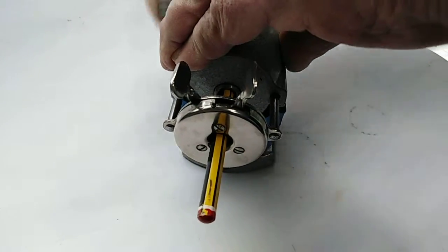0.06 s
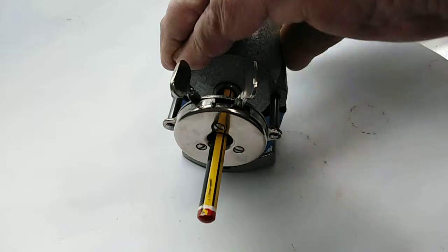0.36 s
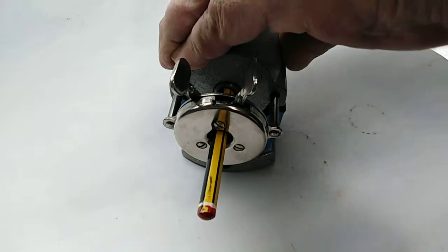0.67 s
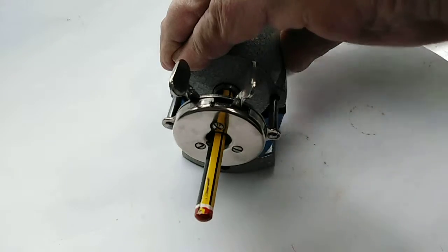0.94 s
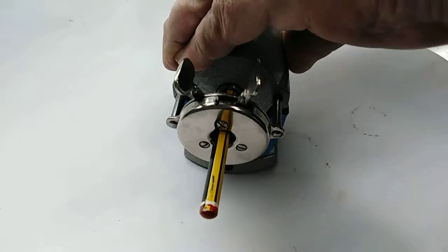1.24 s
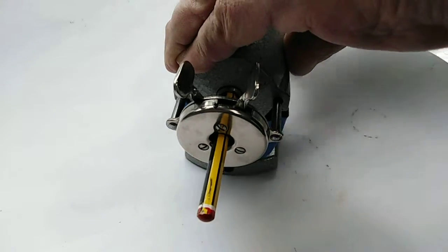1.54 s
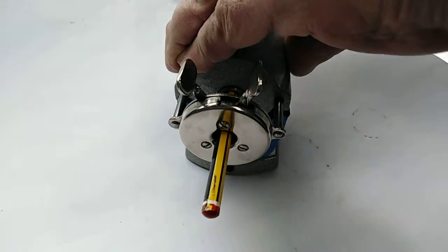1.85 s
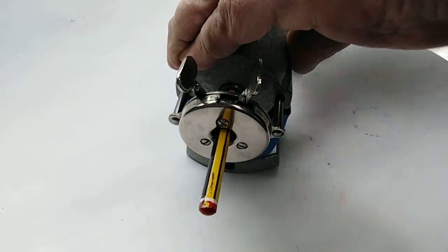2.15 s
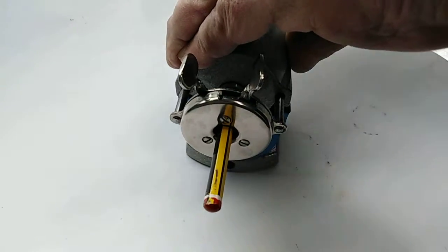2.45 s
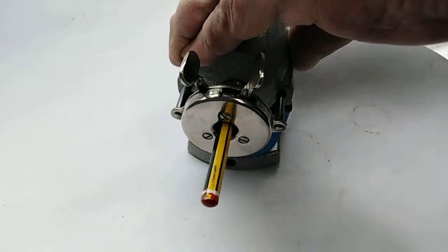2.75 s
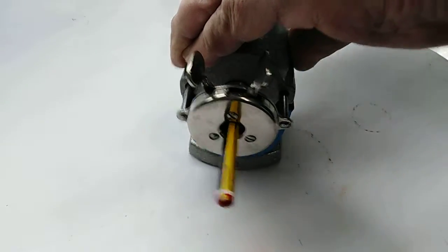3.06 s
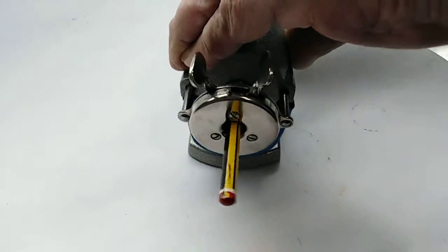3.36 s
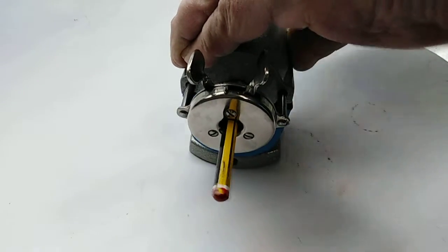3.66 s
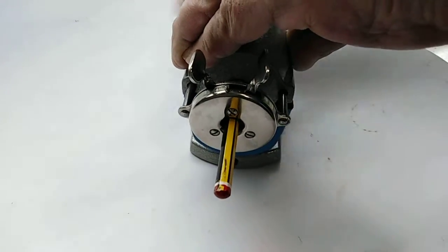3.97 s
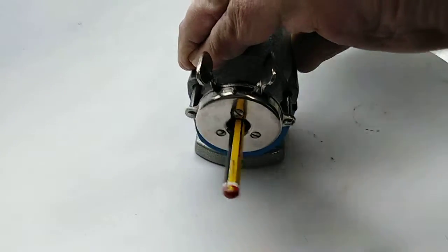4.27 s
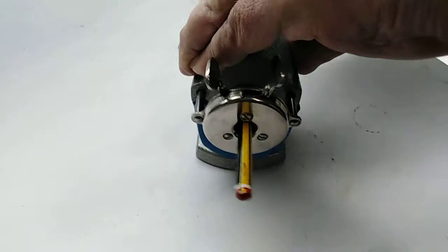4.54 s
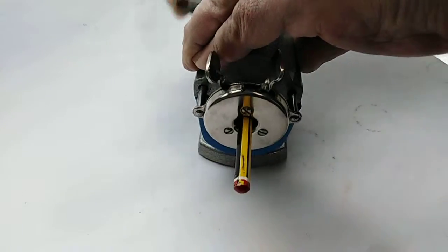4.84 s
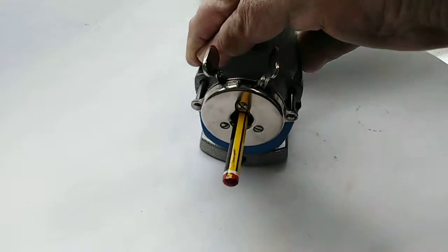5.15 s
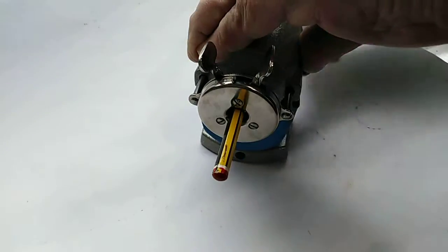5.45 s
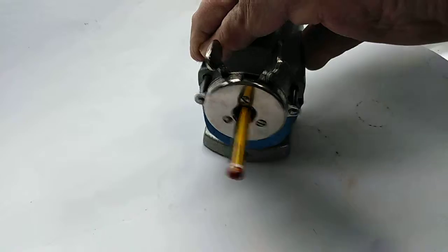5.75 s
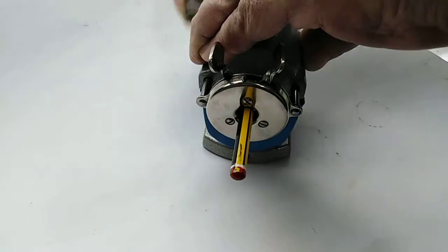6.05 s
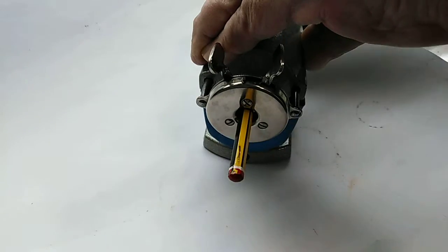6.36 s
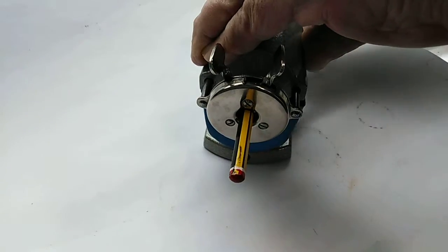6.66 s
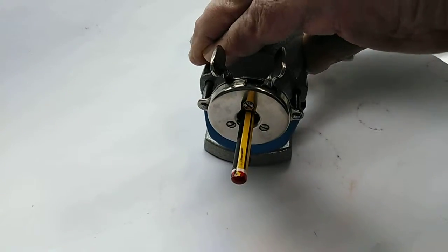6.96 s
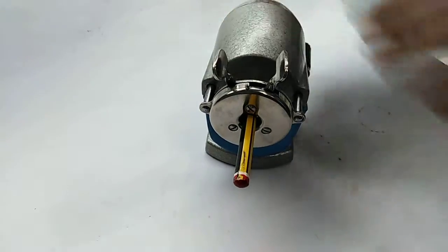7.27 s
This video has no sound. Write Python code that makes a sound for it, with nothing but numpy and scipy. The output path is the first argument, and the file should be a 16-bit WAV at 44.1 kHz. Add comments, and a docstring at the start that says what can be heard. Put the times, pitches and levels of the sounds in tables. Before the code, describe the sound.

Close up in a small, quiet room, a pencil rasps and crackles in the cutter of a metal desk sharpener. The gears rattle in the casing with each turn of the crank and shake the desk. A short, sharp squeak interrupts the rhythm past the middle, followed by lighter, uneven grinding and rubbing, and some faint clicks as the hand lets go.

```python
"""A hand-cranked metal pencil sharpener is turned on a desk in a small, quiet room, heard close in stereo.
From the start the cutter rasps through wood in dense tiny fractures, gear teeth chatter in the casing
and shake the desk, and the pencil rubs in its guide. After seven turns, at 4.3 s, the crank stalls with
a stick-slip squeak. It turns on more lightly, and near 7 s the hand lets go with a few knocks."""
import sys
import numpy as np
from scipy import signal
from scipy.fft import rfft, irfft
from scipy.io import wavfile
from scipy.ndimage import uniform_filter1d

SR = 44100
rng = np.random.default_rng(int(sys.argv[2]) if len(sys.argv) > 2 else 0)


def generate_wav(signal):
    """Clip the signal to [-1, 1] and save it as 16-bit WAV at the path in sys.argv[1]."""
    frames = np.transpose(np.atleast_2d(signal))
    scaled = np.clip(frames, -1, 1) * 32767
    pcm = np.round(scaled).astype(np.int16)
    wavfile.write(sys.argv[1], SR, pcm)


N = 326781
TIME = np.arange(N) / SR
LEFT_RIGHT = np.array([[1], [-1]])


def undb(db):
    """Decibels to amplitude ratio."""
    return 10 ** (np.asarray(db) / 20)


def unit(x):
    """Normalisation to rms 1."""
    return x / np.sqrt(np.mean(x ** 2))


def unit_energy(response):
    """Normalisation of a stereo response to energy 1 on the left."""
    return response / np.linalg.norm(response[0])


def sides(pan_db):
    """Level difference as two gains; pan is left minus right."""
    return undb(LEFT_RIGHT * pan_db / 2)


def spectrum(points, size=N):
    """Interpolation of (frequency [Hz], level [dB]) points over log frequency."""
    hz, db = np.transpose(points)
    return np.interp(np.log(np.fft.rfftfreq(size, 1 / SR) + 1), np.log(hz), db)


def band(x, kind, edge_hz, order=4):
    """Butterworth low-pass or high-pass."""
    return signal.sosfilt(signal.butter(order, edge_hz, kind, fs=SR, output="sos"), x)


def convolve(x, response):
    """Linear filtering by a left and a right impulse response."""
    return signal.oaconvolve(np.broadcast_to(x, (2, N)), response, axes=1)[:, :N]


def modes(table, size=8192):
    """Modal superposition: an impulse response is a sum of damped sinusoids."""
    t = TIME[:size]
    return sum(width * undb(db) * sides(pan) * np.exp(-np.pi * width * t)
               * np.sin(2 * np.pi * hz * t - LEFT_RIGHT * lag / 2)
               for hz, width, db, pan, lag in table)


def walk(per_s):
    """Slow random modulation with a spread near 1."""
    return 1.2 * np.interp(TIME * per_s, np.arange(8192), rng.standard_normal(8192))


def grains(per_s, spread_db):
    """Shot noise: random impulses of uneven size, with their own strength on each side."""
    occurs = rng.random(N) < per_s / SR
    sizes = undb(spread_db * np.minimum(rng.exponential(size=N), 5))
    return unit(occurs * sizes * rng.standard_normal((2, N)))


def bursts(times, gains, decays, size=4096):
    """Impact envelopes: instant onset, exponential decay."""
    out = np.zeros(N + size)
    for s, gain, decay in zip(times, gains, decays):
        start = int(np.clip(s * SR, 0, N))
        out[start:start + size] += gain * np.exp(-TIME[:size] / max(decay, 1 / SR))
    return out[:N]


def bumps(times, heights, width_s):
    """A Gaussian swell around each time."""
    return sum(height * np.exp(-np.minimum(((TIME - s) / width_s) ** 2, 20))
               for s, height in zip(times, heights))


def swing(turn, depth_db, peak_turns):
    """Amplitude modulation, one cycle to a turn of the crank."""
    return undb(depth_db * np.cos(2 * np.pi * (turn - peak_turns)))


# spectrum of the room tone: (frequency [Hz], relative level [dB])
ROOM_TONE = [(20, -29), (50, -14), (95, 1.5), (190, -14), (300, -33), (450, -39), (2000, -35), (14000, -44)]
# faint high tones: (frequency [Hz], level [dB])
WHINE = [(9550, -94), (12651, -88)]
def background():
    """Noise floor: a low rumble, partly coherent between the sides, and a phase-modulated whine."""
    noise = rng.standard_normal(N) + 0.48 * rng.standard_normal((2, N))
    rumble = unit(irfft(rfft(noise) * undb(spectrum(ROOM_TONE)), N))
    whine = sum(undb(db) * np.sin(2 * np.pi * hz * TIME + 1.5 * walk(300)) for hz, db in WHINE)
    return undb(-79) * rumble + whine


def room(x, t60_s, wet_db, size=16384):
    """Reverberation: the diffuse field of a small furnished room decays exponentially."""
    t = TIME[:size]
    onset = np.clip(t / 0.0014 - 1, 0, 1)
    tail = rng.standard_normal((2, size)) * undb(-60 * t / t60_s) * onset
    return undb(wet_db) * convolve(x, unit_energy(tail))


# position of the crank: (time [s], angle [turns])
TURNS = [(-.1, 0), (.5, 1), (1.1, 2), (1.71, 3), (2.33, 4), (2.95, 5), (3.68, 6), (4.3, 7), (4.56, 7.08),
         (4.95, 7.5), (5.22, 7.75), (5.62, 8), (6.15, 8.5), (6.3, 8.68), (6.85, 8.84)]
def crank():
    """Rotation at piecewise constant speed, in turns so far."""
    return np.interp(TIME, *np.transpose(TURNS))


# pushes of the hand on the crank, in relative levels:
# (time [s], length [s], rasp [dB], swell from start to end [dB], hiss over rasp [dB], gear load [dB])
PUSHES = [(-0.121, 0.39, -38, 0.5, 1.5, -45), (0.243, 0.38, -36.5, 1.5, 1, -44),
          (0.571, 0.2, -37, -2.5, 0, -46.5), (0.712, 0.19, -33.5, 14.5, 0.5, -45.5),
          (0.863, 0.43, -36.5, -5, 1, -45), (1.22, 0.3, -37, 1, 1, -47), (1.399, 0.3, -35, 2, 2.5, -43),
          (1.653, 0.24, -35.5, -11, -3, -44), (1.8, 0.17, -41, -8, 5, -49),
          (1.86, 0.27, -37.5, 14.5, 1.5, -46), (2.058, 0.32, -35, 8, 1, -44.5),
          (2.33, 0.34, -40, -1, 0.5, -44.5), (2.567, 0.19, -38, 16.5, 2.5, -47.5),
          (2.743, 0.42, -36.5, -1, 1, -44), (3.138, 0.37, -40, -9, 0, -48),
          (3.351, 0.1, -33.5, 3, 3.5, -42), (3.467, 0.25, -35.5, 5.5, 4.5, -44.5),
          (3.665, 0.31, -39, 4, -1, -45), (3.917, 0.18, -36.5, 15.5, 2, -44),
          (4.05, 0.3, -36.5, 12, 2.5, -43), (4.285, 0.21, -53.5, -9, -6.5, -44),
          (4.553, 0.39, -43, 0.5, 1, -46), (4.904, 0.19, -44.5, 0, -0.5, -45.5),
          (5.074, 0.24, -47, 18.5, 4, -44.5), (5.31, 0.089, -45.5, 8, -1, -43),
          (5.394, 0.19, -43.5, 0, 0.5, -41.5), (5.529, 0.25, -39.5, 10, -1, -43.5),
          (5.68, 0.21, -41, -12, -2, -42.5), (5.856, 0.16, -44, 7.5, 0.5, -49),
          (5.944, 0.34, -41, 18.5, 0.5, -46.5), (6.243, 0.077, -47, -12, 1, -45.5),
          (6.318, 0.1, -51, -20, 0.5, -47.5), (6.455, 0.11, -55.5, -11, 2, -54),
          (6.555, 0.1, -52, 4, 2, -45.5), (6.651, 0.056, -50.5, 15, 4, -40.5),
          (6.701, 0.13, -57, 9, 8.5, -44.5)]
def pushes(attack_s=0.046, release_s=0.045, arch_db=4, gear_exponent=0.48):
    """Incoherent addition: overlapping pushes sum in power to envelopes of rasp, hiss and gear load."""
    power = np.zeros((3, N))
    for s, length, rasp_db, swell_db, hiss_db, gear_db in PUSHES:
        on = (TIME > s) & (TIME < s + length)
        t = TIME[on] - s
        place = 2 * t / length - 1
        grip = np.minimum(np.minimum(t / attack_s, (length - t) / release_s), 1)
        force = grip * undb(swell_db * place / 2 - arch_db * place ** 2)
        bite = undb(rasp_db) * force
        load = undb(gear_db) * force ** gear_exponent
        power[:, on] += np.array([bite, undb(hiss_db) * bite, load]) ** 2
    return np.sqrt(power)


# desk top: (frequency [Hz], bandwidth [Hz], level [dB], pan [dB], left lag [rad])
DESK_MODES = [(89.4, 5.1, 2.5, -1, 0.083), (100.3, 12, 3, -1.4, 0.0069), (162, 70, -9.5, 0, 0.12),
              (248.7, 11, -10.5, 0.72, 0.13), (309, 150, -11.5, 0, 0.23)]
# the base rocks on the desk: (time [s], level [dB])
ROCKS = [(0.38, -44.5), (1.02, -43.5), (1.33, -50), (1.89, -53), (2.27, -47), (2.88, -45), (3.58, -44.5),
         (3.9, -68), (4.44, -49), (4.65, -55), (5.42, -42), (5.81, -68), (6.2, -63), (6.79, -54)]
def desk(mesh, load):
    """Structure-borne sound: gear jolts pass through the base into the low modes of the desk."""
    thud = convolve(rng.standard_normal(N) * (mesh + 1.8), modes(DESK_MODES))
    thud = band(band(thud, "high", 73, order=6), "low", 335, order=10)
    s, db = np.transpose(ROCKS)
    rocking = bumps(s, undb(db), width_s=0.042)
    return unit(thud) * np.hypot(undb(-7) * load, rocking)


# cast body: (frequency [Hz], bandwidth [Hz], level [dB], pan [dB], left lag [rad])
CASING_MODES = [(690, 90, -18, -6, 4.7), (670, 42, 1, -5, 0.67), (808, 63, 9.5, -1.5, 0.51),
                (951, 30, 2, -2, 0.66), (1074, 100, -1.5, -2, 0.73), (1316, 22, 5.5, -8.5, 2.3),
                (1637, 120, 1.5, -7.5, 2.33), (2250, 230, -12.5, -17, 2.6)]
def casing():
    """Radiation efficiency: the response of a body too small to radiate lows."""
    return unit_energy(band(modes(CASING_MODES), "high", 486, order=6))


def clonks(times, gains, pitches, rise_s=.004, lag_rad=1, size=1024):
    """Damped vibration of the hand-held casing; the pitch depends on where the parts touch."""
    out, t = np.zeros((2, N + size)), TIME[:size]
    shape = (t / rise_s * np.exp(1 - t / rise_s)) ** 2 * sides(-3.5)
    for s, gain, hz in zip(times, gains, pitches):
        start = int(s * SR)
        tone = np.sin(2 * np.pi * hz * t - LEFT_RIGHT * lag_rad / 2)
        out[:, start:start + size] += gain * shape * tone
    return out[:, :N]


def tooth_times(turn, play, per_turn):
    """Timing jitter: evenly spaced teeth each meet a little early or late."""
    angles = (np.arange(len(play)) + .2 * play) / per_turn
    return np.interp(angles, turn, TIME, left=TIME[-1])


def teeth(turn, scatter_db, decay_s, per_turn):
    """Quasi-periodic forcing: each tooth strikes with a random strength."""
    play, force = rng.standard_normal((int(per_turn * turn[-1]), 2)).T
    gains = undb(scatter_db * np.tanh(force))
    return unit(bursts(tooth_times(turn, play, per_turn), gains, np.full(len(play), decay_s)))


def gears(turn, mesh, load, rattles_per_turn=40, rattle_hz=770, scatter_db=6):
    """Friction and backlash: meshing teeth scrape and ring the casing, loose ones knock in their play."""
    friction = grains(per_s=6000, spread_db=1.2)[0] * (mesh + 1.2)
    scrape = unit(convolve(friction, casing())) * undb(0.24 * walk(13) - 3.0)
    play, force, tune = rng.standard_normal((int(rattles_per_turn * turn[-1]), 3)).T
    times = tooth_times(turn, play, rattles_per_turn)
    rattle = unit(clonks(times, undb(scatter_db * np.tanh(force)), rattle_hz * (1 + .085 * tune)))
    return (scrape + undb(-6) * rattle) * load * swing(turn, depth_db=0.5, peak_turns=0.43)


# steel pencil clamp: (frequency [Hz], bandwidth [Hz], level [dB], pan [dB], left lag [rad])
CLAMP_MODES = [(1103, 70, 16, 5.5, .6), (2100, 650, 7, 2, 0.75), (2700, 130, 4.5, 2, 0.79),
               (3460, 75, -0.5, -5.5, .5), (4180, 160, 1, 9, 0.31)]
# knocks of crank and casing:
# (time [s], relative level [dB], clack offset [dB], rattle decay [s], frequency [Hz])
KNOCKS = [(0.028, -33, -22, .008, 829), (0.167, -33, -17, .006, 684), (0.224, -32, -15, .008, 778),
          (0.336, -35, -6, .025, 790), (0.356, -33, -20, .008, 697), (0.615, -32.5, -25, .012, 799),
          (0.689, -34, -18, .006, 716), (0.732, -33.5, -22, .004, 830), (0.847, -29.5, -18, .008, 770),
          (0.978, -32, -20, .03, 805), (1.004, -32, -24, .015, 800), (1.03, -30, -17, .008, 810),
          (1.129, -32, -16, .02, 802), (1.143, -31, -22, .008, 825), (1.174, -32, -22, .008, 775),
          (1.192, -34, -6, .012, 830), (1.24, -32, -22, .008, 715), (1.323, -30, -17, .008, 802),
          (1.513, -29, -24, .01, 681), (1.567, -33, -20, .01, 799), (1.717, -28.5, -11, .025, 781),
          (2.195, -30.5, -20, .025, 829), (2.675, -32, -20, .025, 800), (2.747, -33.5, -24, .006, 824),
          (2.823, -32.5, -24, .008, 786), (2.859, -29, -18, .012, 818), (2.98, -34, -18, .03, 790),
          (3.19, -34, -16, .012, 900), (3.392, -30, -10, .005, 767), (3.532, -28, -15, .015, 821),
          (3.578, -33.5, -22, .008, 716), (3.748, -34.5, -24, .008, 818), (3.795, -32, -21, .006, 840),
          (4.028, -28, -29, .008, 805), (4.174, -26, -10, .01, 713), (4.29, -30, -12, .008, 818),
          (4.652, -33, -26, .01, 794), (4.666, -31, -25, .012, 850), (4.696, -29.5, -22, .005, 805),
          (5.019, -35.5, -24, .008, 775), (5.388, -29, -1, .002, 756), (5.413, -36, 2, .002, 780),
          (5.42, -29, -6, .007, 799), (5.425, -34, -6, .004, 900), (5.698, -33, -16, .008, 800),
          (5.726, -28.5, -5, .008, 800), (5.775, -33, -20, .008, 880), (6.177, -35.5, -22, .008, 713),
          (6.224, -35.5, -22, .008, 756), (6.269, -32.5, -5, .006, 810), (6.513, -45, -26, .006, 800),
          (6.573, -44, -9, .006, 800), (6.663, -45, -18, .006, 800), (6.729, -40, -12, .006, 800),
          (6.953, -37, -2, .004, 850), (6.958, -41, -2, .004, 780), (7.047, -47, -18, .004, 815),
          (7.056, -47.5, -16, .005, 815), (7.115, -68, -7, .012, 800), (7.153, -62, -8, .015, 800),
          (7.378, -71, 5, .006, 800)]
def knocks():
    """Impact excitation: loose parts ring the casing, and hard blows also clack in the clamp."""
    s, db, clack_db, rattle_s, hz = np.transpose(KNOCKS)
    chatter = rng.standard_normal(N) * bursts(s, undb(db - 8), rattle_s)
    blow = bursts(s, undb(db + clack_db + 2.5), np.zeros(len(s)))
    crack = rng.standard_normal(N) * bursts(s, undb(db + clack_db - 3.5), rattle_s)
    clamp = unit_energy(band(modes(CLAMP_MODES), "high", 450))
    return clonks(s, undb(db - 5.5), hz) + convolve(chatter, casing()) + convolve(blow + crack, clamp)


# squeaks of cutter and pencil: (time [s], length [s], frequency [Hz], level [dB], pan [dB])
SQUEAKS = [(1.03, 0.0053, 1250, -34.5, -1), (1.87, 0.029, 1347, -45.5, 2), (2.381, 0.008, 7660, -38, 0),
           (4.323, 0.0094, 7970, -14.5, -4), (4.3322, 0.0072, 7960, -17.5, 12.5),
           (4.3373, 0.0045, 7800, -29, 1), (5.416, 0.022, 1315, -40.5, -9), (5.607, 0.015, 1330, -46.5, -8),
           (5.852, 0.013, 1320, -43.5, -4)]
def squeaks():
    """Stick-slip oscillation: a single mode swells and is choked."""
    out = 0
    for s, length, hz, db, pan_db in SQUEAKS:
        t = TIME[:int(length * SR)]
        tone = np.sin(np.pi * t / length) ** 0.4 * np.sin(2 * np.pi * hz * t)
        start = int(s * SR)
        out = out + undb(db) * sides(pan_db) * np.pad(tone, (start, N - start - len(t)))
    return out


# the casing throws each band to one side: (frequency [Hz], pan [dB])
DIRECTIVITY = [(1000, 5.5), (2200, -11.5), (2700, 0), (3400, -5), (3800, -11), (5000, 1), (6300, 5),
               (7900, 5.5), (9000, -3), (10400, -5), (13000, -10), (13600, -16.5), (14300, -10)]
def radiation(points, size=1024):
    """Directivity: a minimum-phase response with the given spectrum, panned band by band."""
    magnitude = undb(spectrum(points, size)) * sides(spectrum(DIRECTIVITY, size))
    cepstrum = irfft(np.log(magnitude))
    causal_fold = 1 + np.sign(size / 2 - np.arange(size))
    causal_fold[0] = 1
    return irfft(np.exp(rfft(cepstrum * causal_fold)))


# snapping splinters and ticks of metal: (time [s], level [dB])
SNAPS = [(0.2705, -30), (0.7507, -26.5), (2.621, -30), (3.503, -30), (3.5234, -25), (3.5443, -27),
         (3.794, -28), (4.568, -44), (6.4707, -53), (6.6643, -49), (6.7378, -38), (7.2505, -66),
         (7.3783, -48)]
def snaps(decay_s=.003):
    """Broadband transients: each crack is a short burst of bright noise."""
    s, db = np.transpose(SNAPS)
    crack = radiation([(500, -30.5), (1700, -4.0), (4000, -2.0), (6400, 3.5),
                       (9000, 0.5), (12500, -6.0), (13700, 2.5)])
    hits = bursts(s, undb(db), np.full(len(s), decay_s))
    return convolve(hits * rng.standard_normal((2, N)), unit_energy(crack))


# steel cutter: (frequency [Hz], bandwidth [Hz], level [dB], pan [dB], left lag [rad])
CUTTER_MODES = [(1640, 88, 1, 2, 0.43), (2137, 320, -1, 7, 2.3), (2810, 130, -2, 8.5, 1.6),
                (3517, 74, -3, 11.5, .5), (4095, 110, 0, 17.5, .4), (5100, 110, 1.5, 5.5, .5)]
# the blades tear a splinter off: (time [s], level [dB], decay [s])
SPLINTERS = [(0.364, -36, .007), (0.541, -39, .007), (0.644, -35, .006), (0.864, -37, .007),
             (1.194, -28.5, .005), (1.509, -35.5, .006), (2.872, -37, .007), (2.978, -37, .006),
             (3.391, -31.5, .005), (3.793, -38, .004), (3.822, -36, .006), (4.2825, -27.5, .005),
             (4.696, -36, .003), (5.3875, -32.5, .0025), (5.4135, -34, .003), (5.728, -30, .003),
             (6.2685, -35.5, .004), (6.954, -42, .006)]
def crunches(bite):
    """Brittle fracture: a few big splinters among many small chips ring the steel cutter."""
    s, db, decay_s = np.transpose(SPLINTERS)
    clicks = unit(np.sign(grains(per_s=2500, spread_db=0)[0]))
    cracks = clicks * bursts(s, undb(db), decay_s)
    chips = grains(per_s=200, spread_db=2.5)[0] * undb(-13) * bite
    steel = unit_energy(band(modes(CUTTER_MODES), "high", 810))
    return convolve(cracks + chips, steel)


def ring(hz, width_hz):
    """Narrow-band noise: low-passed stereo noise is shifted up to a moving centre frequency."""
    pole = np.exp(-np.pi * width_hz / SR)
    noise = signal.lfilter([1], np.poly([pole, pole]), rng.standard_normal((2, N)))
    phase = 2 * np.pi * np.cumsum(hz) / SR
    return unit(noise * np.cos(phase) + noise[::-1] * LEFT_RIGHT * np.sin(phase))


# air in the housing:
# (frequency [Hz], bandwidth [Hz], level [dB], pan [dB], swing [dB], angle of the peak [turns])
AIR_MODES = [(2840, 74, -23, -2.5, 6, 0.84), (3420, 460, -13, 4, 3, 0.11),
             (3835, 150, -18.5, -8.5, 2, 0.33), (4066, 160, -22.5, -1.5, 8.5, 0.86),
             (4420, 460, -17, 6, 1, 0.13), (4880, 330, -17, -7, 1, .1), (5080, 300, -20, -3.5, 6.5, 0.89),
             (7370, 250, -20, 5.5, 0, .1), (7820, 300, -22, 2.5, 1, 0.067)]
def cavity(turn, drive, wander_per_s=24):
    """Cavity resonance: air modes swell as the cutter circles and waver as the pencil shifts."""
    out = np.zeros((2, N))
    for hz, width, db, pan_db, swing_db, peak_turns in AIR_MODES:
        pitch = hz * (1 + .008 * walk(wander_per_s))
        waver = unit(undb(3.5 * walk(wander_per_s)))
        strength = waver * undb(db) * swing(turn, swing_db, peak_turns)
        out += sides(pan_db) * ring(pitch, width) * strength
    return out * drive


# rubbing, which grows as the point gets smooth: (time [s], relative level [dB], frequency [Hz])
RUB = [(0, -18.5, 6310), (2.55, -10, 6450), (2.8, -5, 6300), (2.95, -13.5, 6450), (3.4, -8.5, 6440),
       (3.48, 1.5, 6340), (3.6, -9, 6250), (3.9, -8.5, 6470), (4.08, -3.5, 6390), (4.25, -12, 6370),
       (4.601, -1.5, 6600), (4.9, -8.5, 6730), (5.119, -0.5, 6470), (5.24, -2.5, 6400), (5.361, 1, 6430),
       (5.5, -3, 6400), (5.75, -7.5, 6400), (6.2, -4, 6450), (6.85, 3, 6500)]
def rubbing(turn):
    """Sliding friction: the pencil's cone rubs in a narrow band that drifts in pitch."""
    s, db, hz = np.transpose(RUB)
    strength = undb(np.interp(TIME, s, db) - 1.0) * swing(turn, depth_db=1, peak_turns=0.66)
    return ring(np.interp(TIME, s, hz), width_hz=910) * strength


def ripple(x, turn, decay_s=0.002, count=9, size=256):
    """Spectral ripple: random short echoes, cross-faded with the crank angle, shift the rasp's colour."""
    out = 0
    for index in range(count):
        response = rng.standard_normal((2, size)) * np.exp(-TIME[:size] / decay_s)
        response /= np.linalg.norm(response, axis=1, keepdims=True)
        response[:, 0] = 1  # direct sound
        offset = count * np.abs((turn - index / count + .5) % 1 - .5)
        crossfade = np.sqrt(np.clip(1 - offset, 0, 1))
        out = out + convolve(x * crossfade, response)
    return out / np.sqrt(2)


def shimmer(x, depth_db=2.1, size=512):
    """Spectral modulation: narrow bands swell and fade on their own, a shifting metallic colour."""
    bands = signal.stft(x, nperseg=size)[2]
    drift = uniform_filter1d(rng.standard_normal(bands.shape[1:]), size=3, axis=0)
    drift = uniform_filter1d(drift, size=10, axis=1)
    gains = unit(undb(depth_db * unit(drift)))
    return signal.istft(bands * gains, nperseg=size)[1][:, :N]


# the blades catch and dig in: (time [s], extra level [dB])
CATCHES = [(0.222, 8.5), (1.142, 1.5), (1.193, 9.5), (1.725, 3.5), (2.21, 1.5), (2.725, 2.5), (2.87, 2.5),
           (2.96, 2), (4.15, 5.5), (5.23, 2.5), (5.73, 4)]
def blades(turn, depth=0.18):
    """Roughness: the quick, uneven strikes of the spiral blades modulate the amplitude of the cut."""
    strikes = unit(2 + depth * teeth(turn, scatter_db=7.5, decay_s=0.0088, per_turn=61))
    catch_db = bumps(*np.transpose(CATCHES), width_s=0.026)
    flicker_db = 1.6 * walk(30) + walk(80) + 0.38 * walk(350)
    return strikes * undb(catch_db + flicker_db)


# spectra of the wood's rasp and of its fine hiss: (frequency [Hz], relative level [dB])
RASP_SPECTRUM = [(500, -12), (1500, -4.5), (2150, -4), (2550, -5.5), (3150, -16), (3750, -15.5),
                 (4100, -2.5), (5100, 2), (5550, 2), (6000, 2), (7000, -2.5), (7800, 2), (8800, -0.5),
                 (10000, -2), (13000, -20.5)]
HISS_SPECTRUM = [(6000, -54), (8800, -22), (10000, 0), (11100, 3.5), (12100, -0.5), (12900, 4), (13400, 0),
                 (13800, 7), (14200, 5), (14500, -33.5)]
def cutter(turn, bite, fine, load):
    """Acoustic emission: dense fractures of wood merge into a rasp, joined by rubbing and ringing air."""
    roughness = blades(turn)
    rasp = unit(convolve(grains(per_s=5000, spread_db=-0.5), radiation(RASP_SPECTRUM)))
    hiss = unit(convolve(grains(per_s=12000, spread_db=-5.5), radiation(HISS_SPECTRUM)))
    hiss *= undb(0.56 * walk(60))
    tearing = roughness * (bite * undb(-5.5) * rasp + fine * undb(-6.0) * hiss)
    air_drive = roughness * np.hypot(bite, undb(-12) * load)
    return ripple(tearing, turn) + roughness * bite * rubbing(turn) + cavity(turn, air_drive)


def scene():
    """Superposition of the sharpener's direct sound, its reverberation and the noise floor."""
    turn = crank()
    mesh = teeth(turn, scatter_db=-7.0, decay_s=0.021, per_turn=20)
    bite, fine, load = pushes()
    cutting = shimmer(cutter(turn, bite, fine, load)) + crunches(bite)
    machine = cutting + gears(turn, mesh, load) + desk(mesh, load) + knocks() + snaps()
    squeal = squeaks()
    echoes = room(machine, t60_s=0.19, wet_db=-11.0) + room(squeal, t60_s=0.25, wet_db=-7.0)
    return machine + squeal + echoes + background()


def record(dry, top_hz=14300):
    """Band limiting: a steep elliptic low-pass cuts the highest treble."""
    return signal.sosfilt(signal.ellip(10, .2, 70, top_hz, fs=SR, output="sos"), dry)


dry = scene()
out = record(dry)
generate_wav(out)
```